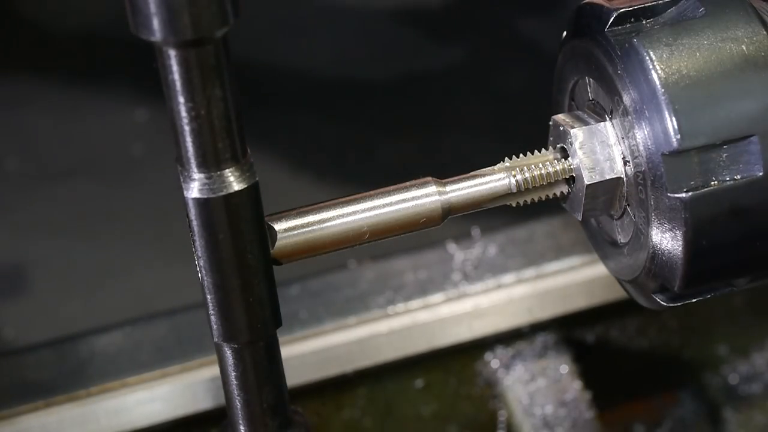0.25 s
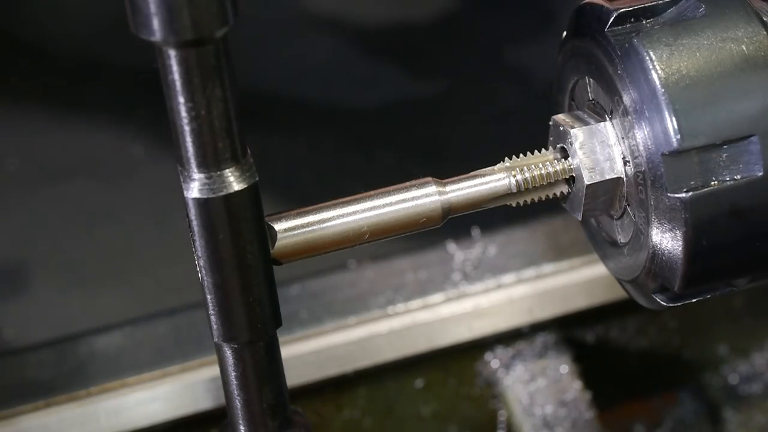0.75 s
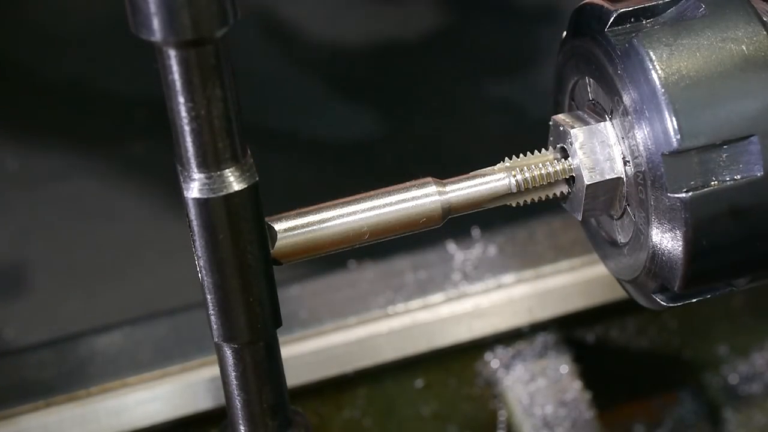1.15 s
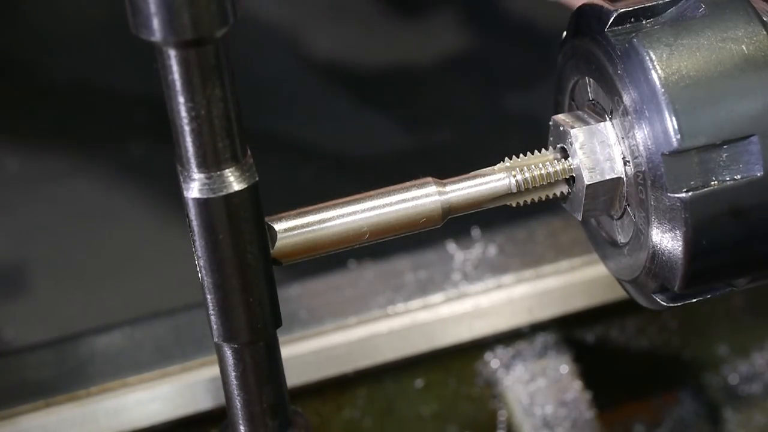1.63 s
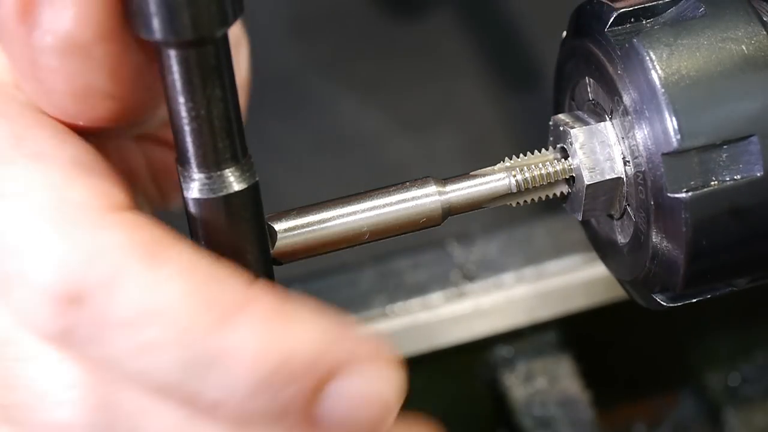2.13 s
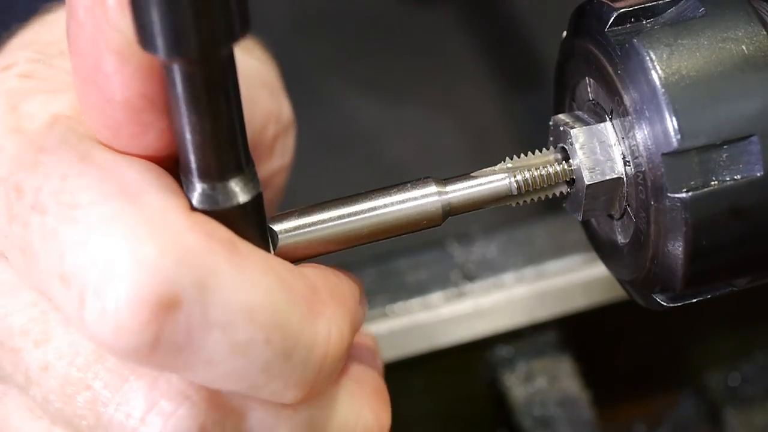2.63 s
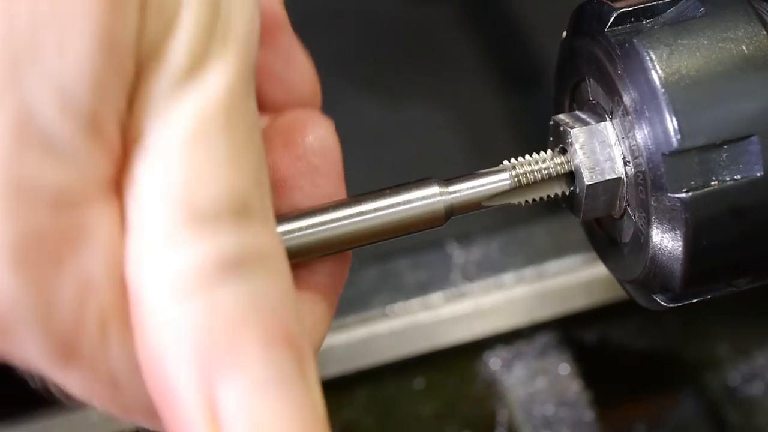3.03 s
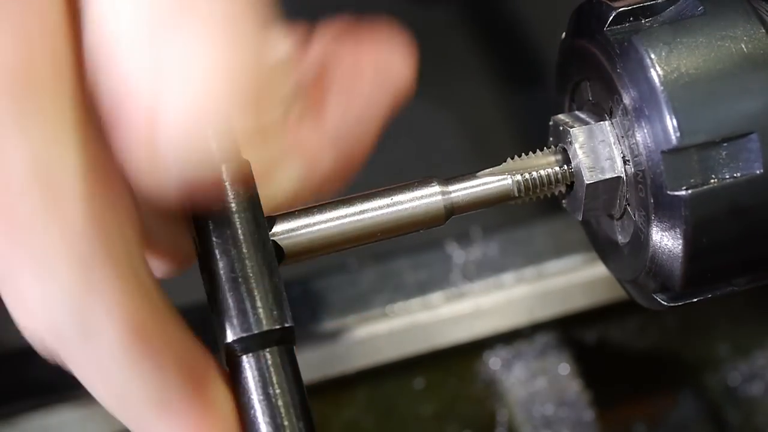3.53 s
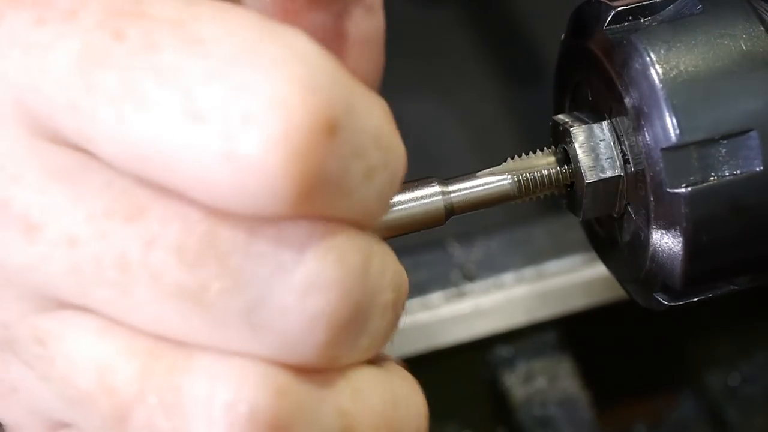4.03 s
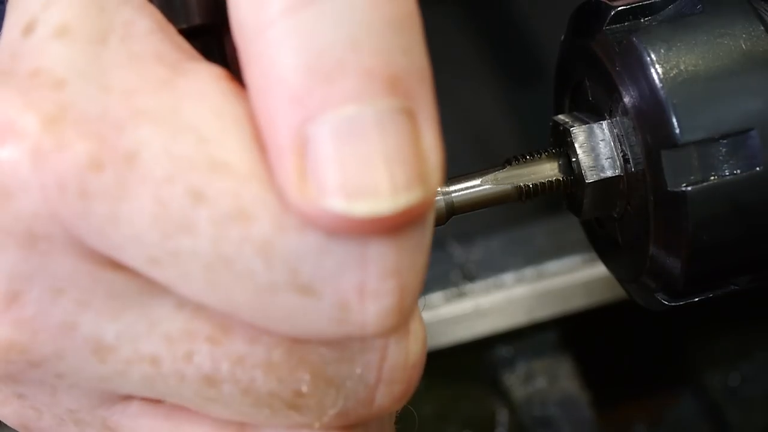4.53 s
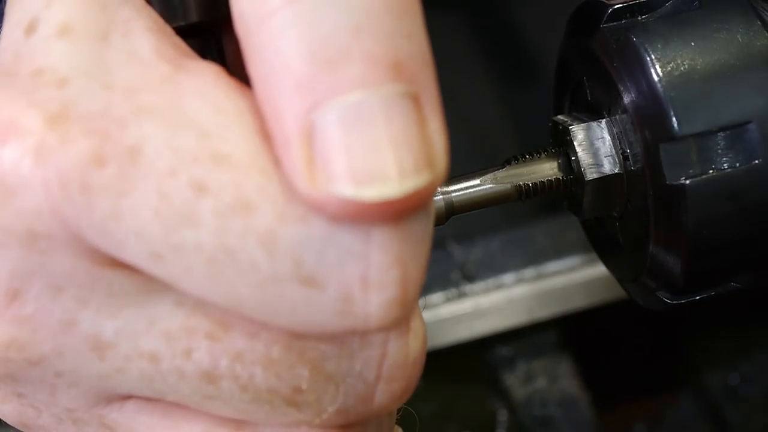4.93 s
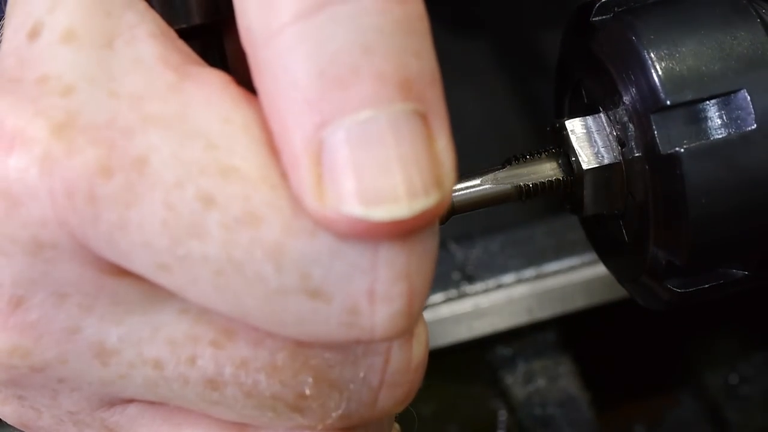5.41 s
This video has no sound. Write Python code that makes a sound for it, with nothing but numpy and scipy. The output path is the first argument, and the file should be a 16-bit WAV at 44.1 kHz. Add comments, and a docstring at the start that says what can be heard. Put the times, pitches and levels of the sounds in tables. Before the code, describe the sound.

Bench knocks and tray rattle, cloth rustle and fine metal ticks, then two loud sharp steel snaps and a final dull thud in a small workshop.

```python
"""Knocks and drags on a bench come first, with a rattling tray, a humming microphone stand and a sleeve's rustle.
A tap is then turned by hand into a steel part in the chuck of a standing lathe: the wrench ticks and scrapes,
and twice the cutting edge sticks and lets go with a loud snap, a faint narrow noise just before it. Solid bodies
are sums of damped modes driven by contact forces or random catches; cloth and air are banded noise; a small
workshop answers by dense reflections."""
import sys
import numpy as np
from scipy import signal
from scipy.io import wavfile

SR = 44100
rng = np.random.default_rng(int(sys.argv[2]) if len(sys.argv) > 2 else 0)


def dump_mix(stems):
    """Bounce the given channels to the path in sys.argv[1] as a 16-bit WAV at rate SR."""
    frames = np.atleast_2d(stems).T  # one column per channel
    limited = np.clip(frames, -1, 1)  # hard clip at full scale
    pcm = np.round(limited * 32767).astype(np.int16)
    wavfile.write(sys.argv[1], SR, pcm)


N = 250047      # length in samples

# Knocks on the bench. Each row: start in seconds, levels of board, stand, tray and crack in dB,
# best-struck pitch of the board and of the tray in Hz, contact length in seconds.
KNOCK_EVENTS = [(0.177, -22.5, -18.5, -81, -34, 402, 980, 0.0035),
                (0.271, -17, -17, -12, -64, 440, 1162, 0.015),
                (0.431, -41, -38, -74, -82, 437, 1130, 0.035),
                (0.509, -34, -31, -60, -80, 340, 1350, 0.013),
                (0.767, -34.5, -21, -46, -53.5, 383, 1320, 0.014),
                (0.786, -24, -35, -24.5, -39, 456, 1460, 0.011),
                (0.805, -30, -47, -39, -68, 387, 1170, 0.011),
                (1.003, -40, -62, -51, -73, 352, 1290, 0.0043),
                (1.051, -44, -31, -46, -55.5, 394, 1320, 0.0072),
                (1.077, -31, -65, -36, -55, 374, 1190, 0.0065),
                (1.161, -30, -60, -29.5, -47, 413, 1240, 0.013),
                (1.205, -30, -58, -36, -57, 470, 1340, 0.017),
                (1.231, -24.5, -55, -35, -46, 403, 1320, 0.009),
                (1.254, -29.5, -30, -56, -61, 350, 1290, 0.0037),
                (1.332, -31, -42, -41.5, -53, 458, 1180, 0.0047),
                (1.37, -40, -44, -46, -65, 705, 921, 0.0066),
                (1.63, -37.5, -34.5, -38.5, -82, 358, 974, 0.0062),
                (2.492, -48.5, -38.5, -40, -61, 420, 990, 0.011),
                (2.534, -32, -39, -23, -64, 335, 970, 0.015), (2.99, -42, -50, -67, -75, 335, 1290, 0.021),
                (3.101, -37, -37.5, -48.5, -63.5, 402, 1320, 0.0045),
                (3.993, -37.5, -37.5, -50, -58, 344, 1060, 0.017),
                (4.042, -43.5, -32, -52, -58.5, 353, 1290, 0.016),
                (5.541, -22.5, -15, -29, -50.5, 493, 1010, 0.013)]
# Two loud snaps, each after a row for the faint narrow noise just before it. Each row: start in seconds,
# level in dB, centre in Hz, breadth in octaves (scale), chuck thud in dB, force length in seconds,
# treble spray in dB.
SNAP_EVENTS = [(4.436, -42, 3600, 0.28, -60.5, 0.022, -68), (4.468, -2, 3490, 0.69, -11.5, 0.0015, -14.5),
               (5.056, -52, 3670, 0.062, -79, 0.014, -79), (5.077, -9.5, 4750, 1.33, -16, 0.0036, -40)]
# Modes of the microphone stand, the bench board, the loose tray and rubbed steel.
# Each row: frequency in Hz, relative level in dB, decay time t60 in seconds.
STAND_MODES = [(119.8, -6, 0.3), (144, -2, 0.19), (186, -6.5, 0.14), (229.4, -12.5, 0.21)]
BOARD_MODES = [(364, -1.5, 0.06), (382, 2.5, 0.046), (439.2, 0.5, 0.062), (521.4, -7, 0.13),
               (604, 1, 0.063), (705.3, -5, 0.09), (764, 0, 0.098)]
TRAY_MODES = [(955, 2.5, 0.043), (1072, -11, 0.067), (1215, 6, 0.024), (1310, 6, 0.022), (1378, -6, 0.03),
              (1800, 1, 0.022)]
RUBBED_STEEL_MODES = [(2451, -0.5, 0.084), (2900, -11.5, 0.014), (4174, -5.5, 0.037), (4900, 6.5, 0.0071),
                      (6770, 2, 0.004), (11850, -6, 0.012)]


def from_db(db):
    """The decibel law: level in dB to amplitude gain."""
    return 10 ** (np.asarray(db) / 20)


def rms_one(x):
    """Normalisation of power: the signal scaled to rms 1."""
    return x / np.sqrt(np.mean(x ** 2) + 1e-20)


def bandpass(x, low_hz, high_hz):
    """Band limiting by a Butterworth filter."""
    return signal.sosfilt(signal.butter(2, [low_hz, high_hz], "band", fs=SR, output="sos"), x)


def in_time(rows):
    """Linear interpolation: the columns of a curve table at every sample."""
    seconds, *columns = np.transpose(rows)
    return [np.interp(np.arange(N) / SR, seconds, column) for column in columns]


def at_hz(points, hz):
    """Interpolation of a spectrum table on a log-frequency axis."""
    table_hz, values = np.array(points).T
    return np.interp(np.log(hz), np.log(table_hz), values)


def add(out, start, sound):
    """Superposition: a sound is added to a track from its start in seconds."""
    i = int(start * SR)
    out[i:i + len(sound)] += sound[:N - i]


def drift(rate_hz):
    """Low-passed noise: a slow random course of rms 1, with its corner near rate_hz."""
    step = 40       # samples between drawn values
    r = np.exp(-2 * np.pi * step * rate_hz / SR)
    settle = 2000   # filter start-up, left out
    noise = rng.standard_normal(N // step + settle + 2)
    slow = signal.lfilter([1], [1, -2 * r, r * r], noise)[settle:]
    return np.interp(np.arange(N) / step, np.arange(len(slow)), rms_one(slow))


def ring(force, hz, t60):
    """A damped mode as a two-pole resonator: a unit click starts a decaying sine of initial height 1."""
    r = from_db(-60 / (max(t60, 1e-3) * SR))
    w = 2 * np.pi * hz / SR
    return signal.lfilter([0, np.sin(w)], [1, -2 * r * np.cos(w), r * r], force + 1e-18)


def contact_force(length):
    """A contact pulse: the force climbs to its peak at a third of length, then thins out; sum 1."""
    t = np.arange(int(0.35 * SR)) / SR
    force = t * np.exp(-3 * t / max(length, 3e-4))
    return t, force / force.sum()


def struck(modes, level_db, length, best_hz, breadth, rough=0.58):
    """Modal excitation by one contact: modes near best_hz (breadth in octaves) take most of the blow."""
    t, force = contact_force(length)
    # tiny releases within the contact
    chatter = rng.standard_normal(len(t)) / np.sqrt(np.sum(force ** 2))
    out = 0
    for hz, mode_db, t60 in modes:
        share = 2 * np.cos(2 * np.pi * (hz * t + rng.random())) + rough * chatter
        favour_db = -6 * (np.log2(hz / best_hz) / breadth) ** 2
        out = out + from_db(level_db + mode_db + favour_db) * ring(force * share, hz, t60)
    return out


def dragged(modes, per_s, uneven_db):
    """Friction as random catches, per_s a second, of uneven size that keep the modes sounding; rms 1."""
    out = 0
    for hz, mode_db, t60 in modes:
        caught = rng.random(N) < per_s / SR
        catches = caught * rng.standard_normal(N) * from_db(uneven_db * drift(35))
        out = out + from_db(mode_db) * rms_one(ring(catches, hz, t60))
    return rms_one(out)


def rasp(length, low_hz=1700, high_hz=6000):
    """Broadband radiation of a hard contact: noise shaped by a slightly longer force pulse."""
    force = contact_force(1.72 * length)[1]
    noise = bandpass(rng.standard_normal(len(force)), low_hz, high_hz)
    return 0.5 * rms_one(noise) * force / force.max()


def crack(level_db, low_hz, high_hz):
    """The impulse principle: one hard click has a smooth broad spectrum."""
    return from_db(level_db) * bandpass(signal.unit_impulse(512), low_hz, high_hz)


def sweep_gain(rows):
    """Amplitude envelope: each sweep is a smooth swell (start in s, length in s, level in dB)."""
    out = np.zeros(N)
    for start, length, level_db in rows:
        add(out, start, from_db(level_db) * np.hanning(int(length * SR)))
    return out


def banded_noise(spectrum, patchy_db):
    """Partly coherent stereo noise: half-octave bands with their own level, flicker and likeness; rms 1."""
    # Left-right likeness. Each row: frequency in Hz, correlation from 0 to 1.
    likeness = [(30, 0.75), (120, 1), (500, 0.13), (2000, 0.25), (5000, 0.29), (9000, 1)]
    shared_flicker = 0.6    # weight of the course common to all bands
    together = drift(6.6)
    edges = 24 * 2 ** np.arange(0, 9.6, 0.5)
    white = rng.standard_normal((2, 2, N))      # neighbouring bands get unrelated noise
    out = 0
    for k, (low, high) in enumerate(zip(edges, edges[1:])):
        mid, side = bandpass(white[k % 2], low, high)
        hz = np.sqrt(low * high)
        alike = np.clip(at_hz(likeness, hz), -1, 1)
        flicker_db = patchy_db * (shared_flicker * together + drift(21))
        gain = from_db(at_hz(spectrum, hz) + flicker_db)
        out = out + gain * (np.sqrt(1 + alike) * mid + np.sqrt(1 - alike) * side * [[1], [-1]])
    return rms_one(out)


def air():
    """Stationary noise: the air of the shop has a fixed spectrum and no flicker."""
    # Each row: frequency in Hz, relative density in dB per Hz.
    spectrum = [(15, -40), (25, -16.5), (50, 5.5), (72, -16.5), (100, 5.5), (130, 3), (157, -22.5),
                (195, -31), (270, 4), (476, -50), (607, 8.5), (677, -29.5), (775, -16.5), (2690, -28.5),
                (9840, -28), (14800, -36), (16000, -38)]
    return from_db(-57.5) * banded_noise(spectrum, patchy_db=0.0)


def workshop(x):
    """Diffuse reverberation by convolution with noise that dies away band by band."""
    # Each row: frequency in Hz, decay time t60 in seconds.
    decay = [(150, 0.28), (1000, 0.26), (5000, 0.3), (7500, 0.3), (10500, 0.17), (15000, 0.094)]
    level_db = -9.5
    t = np.arange(SR // 2) / SR
    white = rng.standard_normal((2, len(t)))
    edges = 90 * 2 ** (np.arange(30) / 4)
    answer = 0
    for low, high in zip(edges, edges[1:]):
        t60 = at_hz(decay, np.sqrt(low * high))
        answer = answer + bandpass(white, low, high) * from_db(-60 * t / t60)
    answer = answer * np.clip(t / 0.0013, 0, 1)      # the reflections build up over 1.3 ms
    answer = answer / np.sqrt(np.sum(answer[0] ** 2))
    mid, apart = signal.fftconvolve(x[None], answer, axes=1)[:, :N]
    apart = bandpass(apart, 600, 11000)     # what the two sides do not share
    return from_db(level_db) * (mid + 0.62 * apart * [[1], [-1]])


def cloth():
    """Friction noise: cloth rustles, louder and softer, while a sleeve or palm sweeps past."""
    # Rustle, louder and softer. Each row: time in seconds, level in dB.
    rustle = [(0.0, -62.5), (0.82, -66), (1.22, -60.5), (1.67, -69.5), (1.78, -56.5), (1.99, -60),
              (2.54, -65.5), (2.75, -60), (3.25, -56), (3.47, -64), (3.6, -57), (3.95, -56.5),
              (4.18, -60.5), (4.5, -63.5), (4.66, -71.5), (5.05, -63), (5.27, -68), (5.67, -61.5)]
    # Sweeps. Each row: start in seconds, length in seconds, level in dB.
    sweeps = [(1.752, 0.23, -58.5), (2.044, 0.23, -56.5), (3.377, 0.17, -56), (3.537, 0.16, -55.5),
              (3.705, 0.11, -62), (3.988, 0.13, -53), (4.8, 0.15, -61)]
    # Each row: frequency in Hz, relative density in dB per Hz.
    spectrum = [(150, -39), (250, -32.5), (313, -9.5), (493, -12), (761, -4.5), (1280, -8.5), (1580, -12),
                (10200, -12), (14500, -21), (16000, -35)]
    rustle_db, = in_time(rustle)
    gain = np.hypot(from_db(rustle_db), sweep_gain(sweeps))
    return gain * banded_noise(spectrum, patchy_db=2.0)


def thumps():
    """Modal excitation at low pitch: a low thump at 4.04 s, and the low body of the last thud at 5.54 s."""
    # Each row: start in seconds, frequency in Hz, level in dB, t60 in seconds, force length in seconds.
    low_modes = [(4.04, 64, -35.5, 0.16, 0.018), (5.542, 184, -14, 0.035, 0.01),
                 (5.548, 68, -33, 0.15, 0.03), (5.573, 120, -16.5, 0.21, 0.022)]
    out = np.zeros(N)
    for start, hz, level_db, t60, length in low_modes:
        add(out, start, struck([(hz, 0, t60)], level_db, length, hz, breadth=1, rough=0))
    return out


def tones():
    """Resonant filtering: noise through one narrow mode swells and fades as a faint tone."""
    # Each row: start in seconds, length in seconds, frequency in Hz, level in dB.
    swelling = [(1.738, 0.23, 730, -58.5), (2.036, 0.11, 307, -64), (2.777, .3, 607, -77),
                (3.207, 0.17, 625, -57.5), (3.497, 0.11, 763, -55), (4.768, 0.084, 640, -60.5)]
    out = np.zeros(N)
    for start, length, hz, level_db in swelling:
        swell = np.hanning(int(length * SR))
        tone = ring(rng.standard_normal(SR // 2), hz, t60=0.48)[-len(swell):]
        add(out, start, from_db(level_db) * swell * rms_one(tone))
    return out


def swells(starts, holds, levels_db, rise_db_per_s, fall_db_per_s):
    """Energy addition: powers of events that rise, hold and fall at steady dB rates, every 2 ms."""
    t = np.arange(0, N / SR + 0.002, 0.002) - np.array(starts)[:, None]
    before_db = -rise_db_per_s * t
    after_db = fall_db_per_s * (t - np.array(holds)[:, None])
    below_db = np.maximum(before_db, np.maximum(0, after_db))
    return from_db(levels_db).T ** 2 @ from_db(-below_db) ** 2


def unrest():
    """Energy addition for stand hum, board rumble and tray rattle: drags, shudder and rest give the gains."""
    # Things pushed or dragged over the bench. Each row: start in seconds, hold in seconds,
    # stand hum, bench rumble and tray rattle in dB.
    pushes = np.array([(0.0, 0.0054, -43, -45.5, -57.5), (0.219, 0.06, -27.5, -55, -55.5),
                       (0.378, 0.17, -33, -54, -67.5), (0.591, 0.048, -37, -52.5, -79),
                       (0.754, 0.031, -28.5, -48, -66), (1.049, 0.086, -34, -44, -56.5),
                       (1.147, 0.085, -33.5, -33.5, -46), (1.365, 0.039, -38.5, -46, -61),
                       (1.506, 0.16, -49, -58, -67.5), (1.747, 0.38, -56.5, -59.5, -68),
                       (2.718, 0.063, -53.5, -53, -66), (2.856, 0.36, -50.5, -52.5, -59),
                       (3.493, 0.059, -55.5, -57.5, -70), (3.75, 0.0088, -56.5, -78, -85),
                       (3.908, 0.12, -60, -62, -57), (4.225, 0.32, -59.5, -61, -72),
                       (5.611, .05, -42.5, -48, -58)])
    # Levels when nothing moves: hum, rumble and rattle in dB.
    resting_db = (-69, -74.5, -85.5)
    # Shudder relative to a knock on each body: hum, rumble and rattle in dB.
    knock_shudder_db = (-2, -15.5, -34)
    # Shudder relative to the chuck thud of a snap row: hum, rumble and rattle in dB.
    snap_shudder_db = (-25, -23, -57.5)
    hits, snap_rows = np.array(KNOCK_EVENTS), np.array(SNAP_EVENTS)
    blows = np.r_[hits[:, 0], snap_rows[:, 0]]
    # columns 2, 1, 3 of a knock: stand, board, tray; column 4 of a snap: thud
    shudder_db = np.r_[hits[:, [2, 1, 3]] + knock_shudder_db, snap_rows[:, [4]] + snap_shudder_db]
    power = swells(pushes[:, 0], pushes[:, 1], pushes[:, 2:], rise_db_per_s=550, fall_db_per_s=220)
    power = power + swells(blows + 0.0055, 0 * blows, shudder_db, rise_db_per_s=1503, fall_db_per_s=258.5)
    power = power + from_db(resting_db)[:, None] ** 2
    return [np.interp(np.arange(N) / SR, np.arange(len(p)) / 500, np.sqrt(p)) for p in power]


def drags():
    """Friction-driven modes: stand, board and tray are kept sounding by random catches."""
    hum, rumble, rattle = unrest()
    out = hum * dragged(STAND_MODES, per_s=440.0, uneven_db=1.0)
    out += rumble * dragged(BOARD_MODES, per_s=260.0, uneven_db=1.8)
    out += rattle * dragged(TRAY_MODES, per_s=260.0, uneven_db=2.9)
    return out


def grit():
    """Stick and release of grains: grit under a dragged thing excites high modes very unevenly."""
    # Each row: time in seconds, level in dB.
    course = [(0.97, -83), (1.004, -63.5), (1.138, -60), (1.158, -47.5), (1.258, -55), (1.3, -104),
              (1.332, -54), (1.35, -88), (1.42, -85)]
    # Each row: frequency in Hz, relative level in dB, t60 in seconds.
    modes = [(1800, 3.5, 0.017), (2600, -3, 0.027), (3160, 8, 0.013), (3610, 2, 0.022), (4160, -1.5, 0.014),
             (5000, -8, 0.018), (5830, -7, 0.014)]
    t = np.arange(N) / SR
    moving = (t > course[0][0]) & (t < course[-1][0])
    return moving * from_db(in_time(course)[0]) * dragged(modes, per_s=1400.0, uneven_db=6.0)


def knocks():
    """Impact excitation: each knock rings board, loose tray and stand, with a noisy crack."""
    out = np.zeros(N)
    for start, board_db, stand_db, tray_db, crack_db, board_hz, tray_hz, length in KNOCK_EVENTS:
        add(out, start, struck(BOARD_MODES, board_db, length, board_hz, breadth=0.65))
        add(out, start, struck(TRAY_MODES, tray_db, length, tray_hz, breadth=0.24, rough=0.35))
        add(out, start, struck(STAND_MODES, stand_db, length, best_hz=145, breadth=0.5))
        add(out, start, from_db(crack_db) * rasp(length, low_hz=1900, high_hz=4600))
    return out


def rubbing():
    """Friction-driven modes: steel rubbing on steel sounds under smooth swells."""
    # Each row: start in seconds, length in seconds, level in dB.
    rubs = [(0.12, 0.21, -62.5), (1.05, 0.25, -67), (1.72, 0.85, -69.5), (2.76, 0.66, -62.5),
            (3.8, 0.34, -61.5), (4.1, .24, -72)]
    return sweep_gain(rubs) * dragged(RUBBED_STEEL_MODES, per_s=900.0, uneven_db=4.2)


def ticks():
    """Impact of small parts: wrench and chips ring at their own pitch over a broad click and rubbed steel."""
    # Each row: start in seconds, level in dB, ring in Hz, broad click in dB.
    clicks = [(2.676, -47, 8900, -51.5), (2.693, -32.5, 12200, -41.5), (2.717, -37, 9200, -70),
              (2.744, -35, 9140, -46.5), (2.801, -35.5, 8900, -76), (2.835, -34, 11850, -47),
              (2.857, -49, 11800, -72), (2.877, -29.5, 8100, -40.5), (2.906, -50, 8560, -70),
              (2.9387, -45, 11800, -68), (3.0237, -58, 11800, -50), (3.045, -36.5, 6970, -66),
              (3.08, -30.5, 7010, -44), (3.0974, -28.5, 6960, -54), (3.1633, -42, 6800, -48),
              (3.1906, -35.5, 7040, -50), (3.4352, -45.5, 4940, -80), (3.5288, -35.5, 6440, -36.5),
              (4.06, -53, 9110, -52), (4.2239, -49, 8640, -48), (4.284, -46, 7000, -66),
              (4.2992, -40, 5240, -51), (4.3948, -45, 6960, -84)]
    ring_db, steel_db = -7.5, -10   # each mode relative to the tick level; rubbed steel to its click
    out = np.zeros(N)
    for start, level_db, hz, click_db in clicks:
        cluster = [(hz, 0, 0.014), (hz * 1.035, -2, 0.008), (hz * 0.96, -3, 0.008)]   # Hz, dB, t60 s
        add(out, start, struck(cluster, level_db + ring_db, 0.0075, hz, breadth=0.73, rough=0.94))
        add(out, start, struck(RUBBED_STEEL_MODES, click_db + steel_db, 0.0026, best_hz=3040, breadth=1.5))
        add(out, start, from_db(click_db) * rasp(0.004, low_hz=1096, high_hz=15200))
    return out


def snaps():
    """Stick-slip: each loud snap rings tap and wrench, sprays noise and thumps the chuck a moment later."""
    # Modes of tap with wrench, and of the chuck. Each row: frequency in Hz, relative level in dB, t60 in seconds.
    tap_modes = [(1667, -13.5, .03), (2086, 0, 0.03), (2392, 0.5, 0.06), (2614, -1.5, .045),
                 (3030, -5, 0.036), (3484, -1.5, 0.007), (3590, 4, 0.024), (4050, -1, 0.047),
                 (4285, 0.5, .03), (4583, -4.5, 0.019), (4980, -1, 0.059), (5310, -0.5, 0.067),
                 (5480, 0.5, 0.14), (6050, 4, .015), (6230, -1.5, .02), (6600, -14, 0.073)]
    chuck_modes = [(227, -16, 0.098), (423, 0, 0.022), (546, -8, 0.028), (931, 1.5, 0.028),
                   (1208, -4, 0.023)]
    ring_db, rasp_db = -12, -1      # relative to the row's level
    hiss_db, click_db = -7.5, 9     # relative to the treble spray level
    out = np.zeros(N)
    # the faint narrow noise before each snap is made the same way
    for start, level_db, centre_hz, breadth, thud_db, length, spray_db in SNAP_EVENTS:
        add(out, start, struck(tap_modes, level_db + ring_db, length, centre_hz, breadth, rough=0.25))
        # a longer contact peaks later
        add(out, start, struck(chuck_modes, thud_db, length + 0.0081, best_hz=596, breadth=2.0))
        low_hz, high_hz = centre_hz * 0.31 ** breadth, centre_hz * 1.17 ** breadth
        add(out, start, from_db(level_db + rasp_db) * rasp(length, low_hz, high_hz))
        add(out, start, from_db(spray_db + hiss_db) * rasp(2.2 * length, low_hz=6320, high_hz=11600))
        add(out, start + length / 3, crack(spray_db + click_db, low_hz=5500, high_hz=14100))
    return out


def scene():
    """Superposition: bench, tool and hand with the walls answering, over the air of the shop."""
    tool = snaps() + ticks() + rubbing()
    wood = knocks() + drags() + grit() + tones()
    near = tool + wood + workshop(tool + wood)
    # the near sounds lose their deep bass below about 120 Hz
    near = signal.sosfilt(signal.butter(4, 123, "high", fs=SR, output="sos"), near)
    # the bench lies a little to the right
    upper = signal.sosfilt(signal.butter(2, 600, "high", fs=SR, output="sos"), wood)
    near = near + 0.15 * upper * [[-1], [1]]
    return near + thumps() + cloth() + air()


def record(dry):
    """Band limitation: an elliptic low-pass cuts the top steeply."""
    cutoff_hz, ripple_db, stop_db = 15750, 0.5, 65
    return signal.sosfilt(signal.ellip(8, ripple_db, stop_db, cutoff_hz, fs=SR, output="sos"), dry)


dry = scene()
out = record(dry)
dump_mix(out)
```